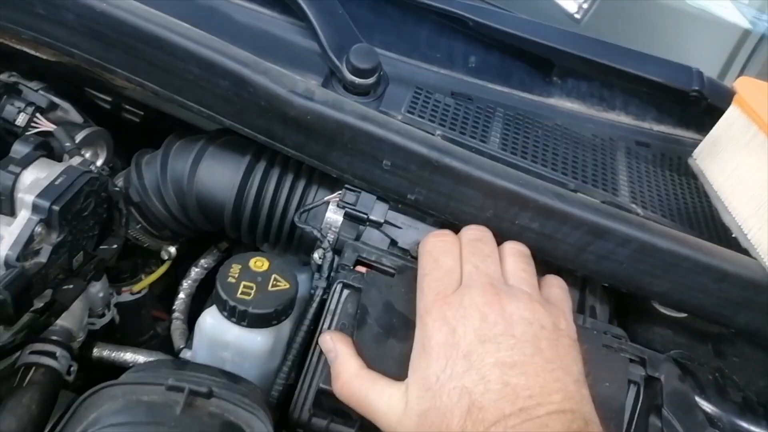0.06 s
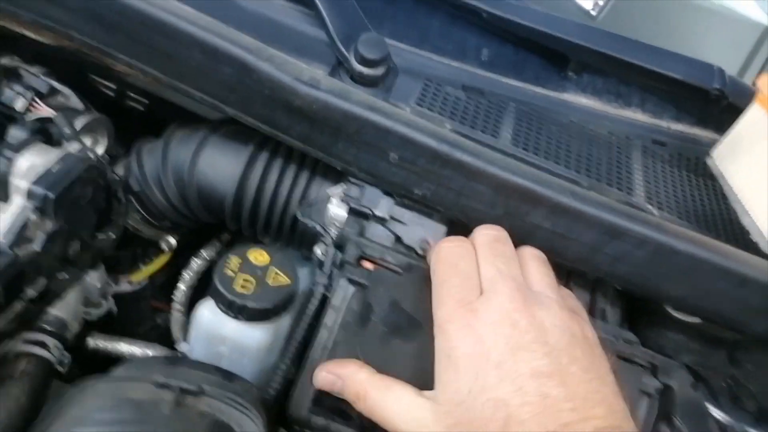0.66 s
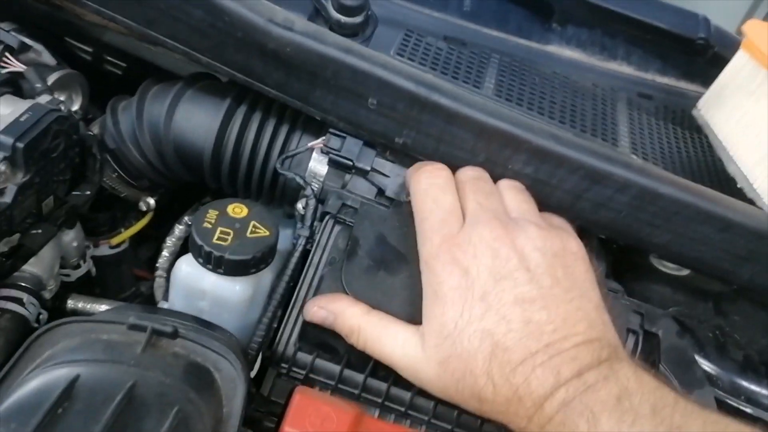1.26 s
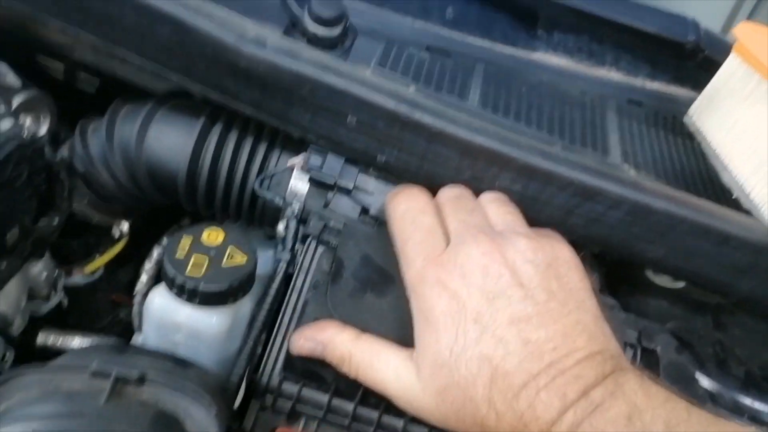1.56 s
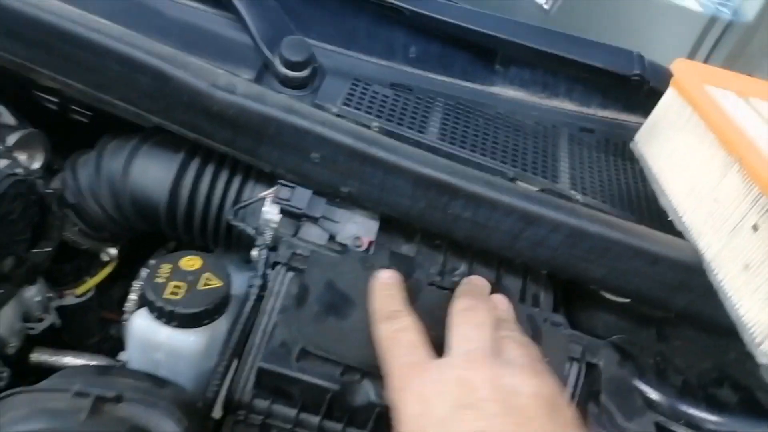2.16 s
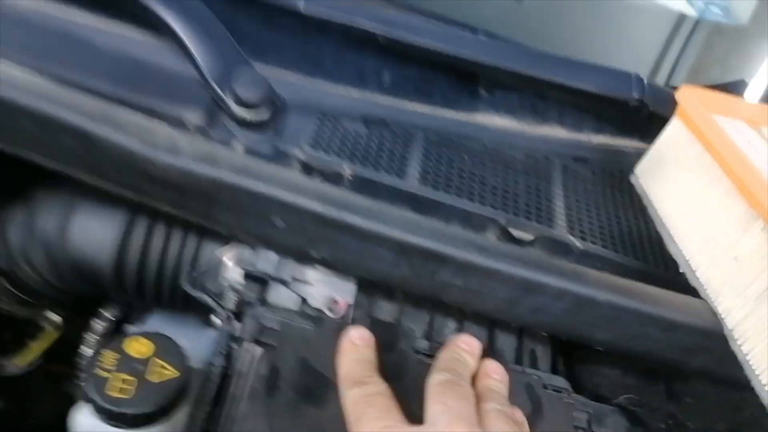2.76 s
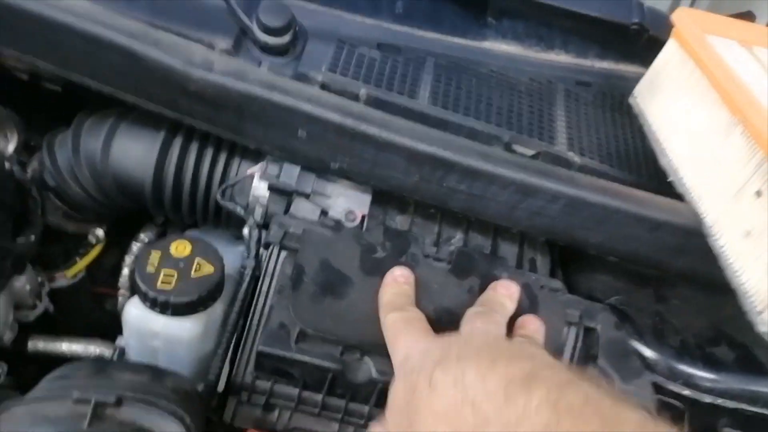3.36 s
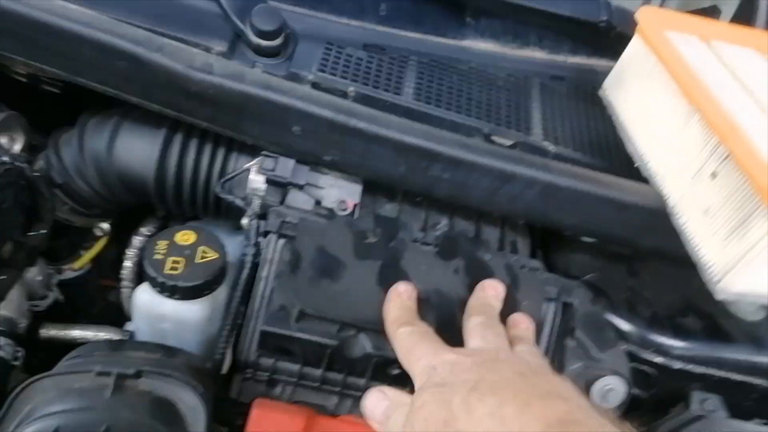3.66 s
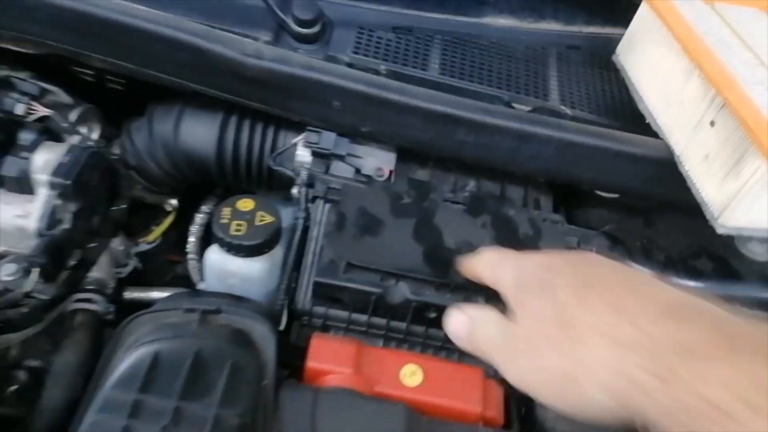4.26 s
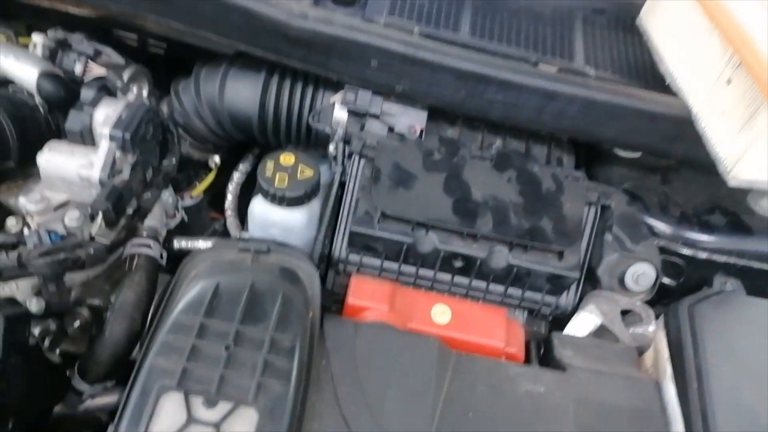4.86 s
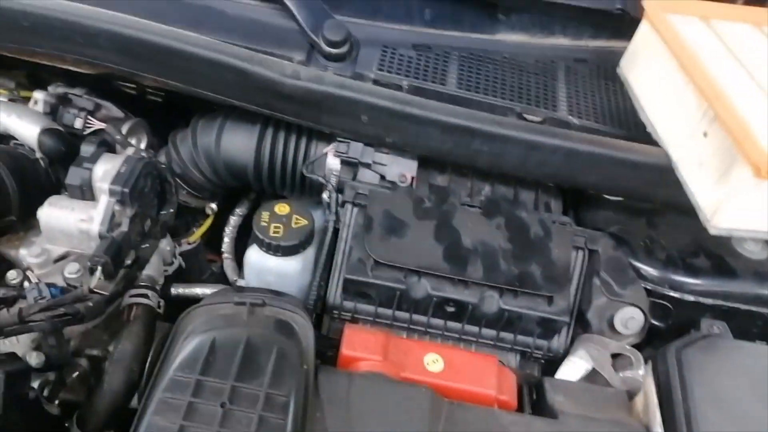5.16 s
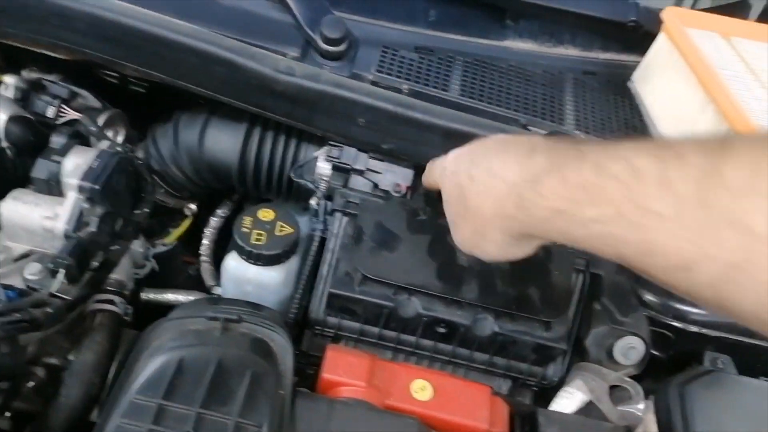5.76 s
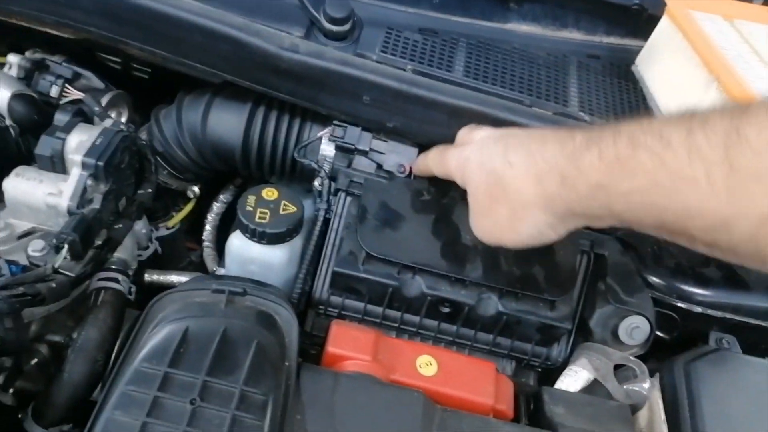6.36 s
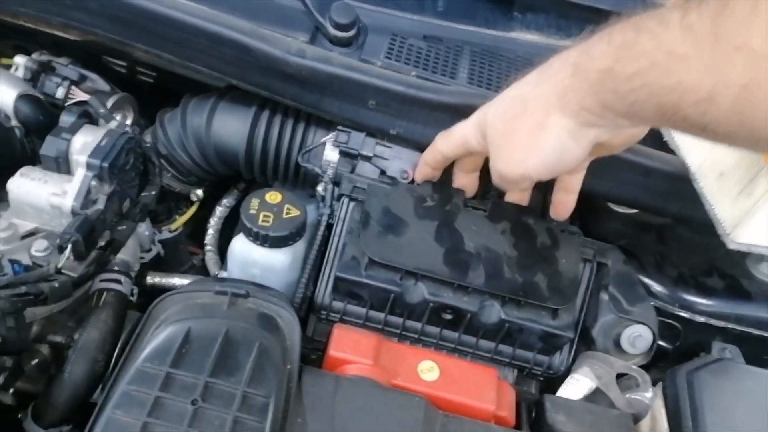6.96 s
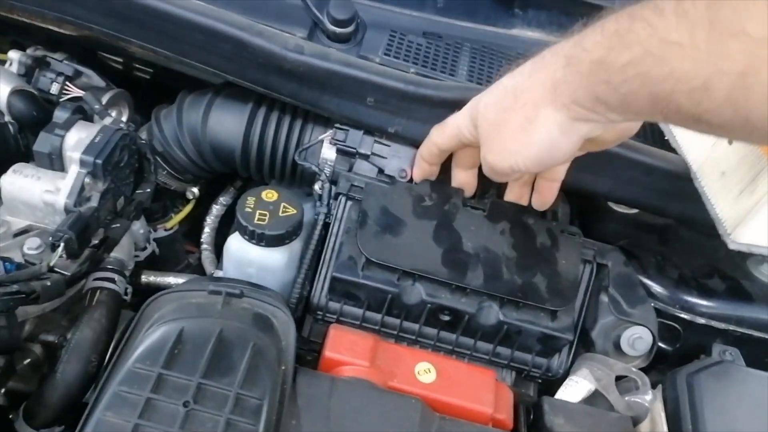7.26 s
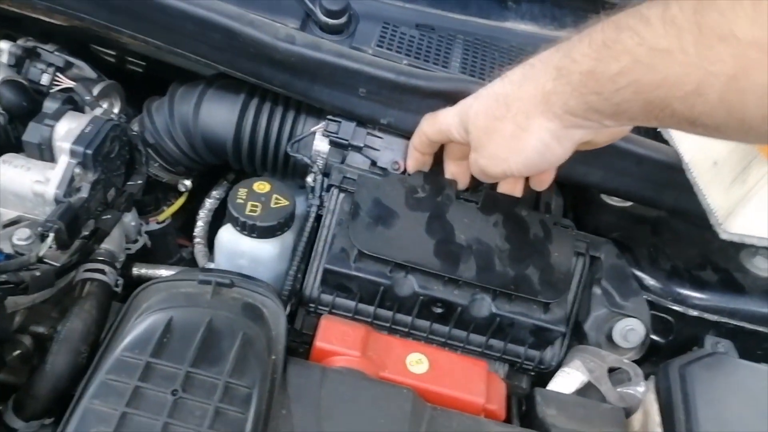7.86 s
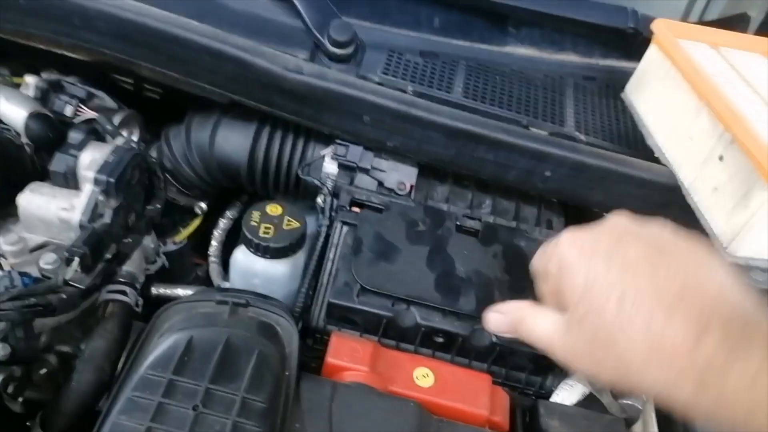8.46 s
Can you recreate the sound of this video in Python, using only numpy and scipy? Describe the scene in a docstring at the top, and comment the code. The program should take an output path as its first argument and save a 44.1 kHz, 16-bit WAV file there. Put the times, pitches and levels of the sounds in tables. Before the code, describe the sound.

Close to the microphone in a quiet workshop, a plastic lid clicks and knocks irregularly against a hollow filter box. Fingers then slide and tap softly on it, and the box rumbles faintly under the palm. The lid knocks twice with a short creak and, after more light handling, gives a sharp final clack. The harder hits leave a faint thin ring in the engine bay and a little room echo.

```python
"""A quiet workshop, under a car's open bonnet, the stereo microphone close to the air filter housing.
A hand rocks and presses the plastic lid into its seat. Each contact cracks at the rim, clacks in a
panel and thuds in the hollow box; in between, fingers and rim scrape, the plastic creaks and the box
hums or rumbles. Hard blows set a thin ring going in the engine bay, and the room answers."""
import sys
import numpy as np
from scipy import signal
from scipy.fft import rfft, irfft, next_fast_len
from scipy.io import wavfile
from scipy.ndimage import uniform_filter1d, map_coordinates

SR = 44100
rng = np.random.default_rng(int(sys.argv[2]) if len(sys.argv) > 2 else 0)


def inscribe(sig):
    """Save sig as 16-bit PCM at rate SR to the path in sys.argv[1].

    A 1-D sig is mono; a 2-D sig holds one channel per row.
    Samples are clipped to [-1, 1] before scaling.
    """
    pcm = np.round(np.clip(np.atleast_2d(sig).T, -1, 1) * 32767)
    wavfile.write(sys.argv[1], SR, pcm.astype(np.int16))


N = 374841
LEAD_S = .01  # time allowed for the scuff before a contact


# The lid on its seat, close up:
# (time [s], clack [dB], panel pitch [Hz], box thud before trim [dB], rim crack before trim [dB], length [s])
LID_KNOCKS = [(0.174, -45.5, 625, -39, -55, .009), (0.553, -30, 1100, -25.5, -45.5, 0.011),
              (1.009, -35.5, 1220, -36.5, -56.5, .005), (1.015, -40, 1170, -35, -66, 0.0037),
              (1.103, -21.5, 1220, -28, -35, .005), (1.112, -29, 425, -28, -47, 0.0089),
              (1.453, -26.5, 1050, -34.5, -53.5, 0.0019), (1.551, -42.5, 456, -46.5, -55.5, .006),
              (1.819, -38.5, 1325, -52, -49.5, .002), (1.865, -36, 680, -33.5, -50, 0.0056),
              (1.892, -38.5, 780, -39, -46, .004), (2.516, -21.5, 1336, -28, -39, .003),
              (2.813, -38, 900, -66, -54, 0.00088), (5.636, -27, 682, -30.5, -46.5, 0.011),
              (5.713, -32, 620, -35.5, -51.5, 0.0039), (7.9018, -19, 1210, -25.5, -34, 0.0034),
              (7.905, -21, 1540, -31.5, -38, 0.0049), (7.918, -25, 2200, -31.5, -35.5, .0045),
              (7.921, -21.5, 600, -30, -43, 0.0047), (8.091, -44.5, 509, -45.5, -60, 0.028)]

def knocks(hard_db=-33, touch_s=.0035, touch_db=-15.5, heavy_db=-28, rebound_s=.023, rebound_hz=449):
    """The lid strikes its seat; a hard blow lands edge first, and a heavy one drops back once, softly."""
    blows = list(LID_KNOCKS)
    for s, clack_db, hz, thud_db, crack_db, length in LID_KNOCKS:
        if clack_db > hard_db:
            blows.append((s - touch_s, clack_db + touch_db, hz,
                          thud_db + touch_db, crack_db + touch_db, length / 2))
        if thud_db > heavy_db:
            rebound_db = thud_db - 7.5
            blows.append((s + rebound_s, rebound_db - 17.5, rebound_hz, rebound_db, rebound_db - 31, .0036))
    return play_contacts(blows)


# Fingertips on the lid: (time [s], clack [dB], panel pitch [Hz])
FINGER_TAPS = [(0.773, -54.5, 796), (1.284, -49, 1050), (3.448, -60.5, 800), (3.746, -58.5, 880),
               (3.796, -49.5, 675), (4.07, -48, 1065), (4.203, -48, 984), (6.241, -62, 836),
               (6.473, -57, 820), (6.723, -49, 1730), (6.993, -56, 970)]

def taps(length=.0098):
    """Flesh makes a long, soft contact with little crack; a stiffer, higher spot moves the box less."""
    return play_contacts([(s, db, hz, db + 2.5 - 12 * np.log2(hz / 960), db - 9.5, length)
                          for s, db, hz in FINGER_TAPS])


# The rim catching: (time [s], crack before trim [dB])
RIM_TICKS = [(1.606, -51), (1.75, -61.5), (1.782, -57.5), (1.814, -50.5), (1.861, -36), (2.585, -56),
             (3.727, -62), (3.906, -54), (3.932, -59), (4.096, -67), (5.614, -50), (5.733, -41)]

def ticks(panel_hz=1250, length=.0022):
    """The rim slips past an edge with a short, bright contact."""
    return play_contacts([(s, db - 3, panel_hz, db - 1, db, length) for s, db in RIM_TICKS])


def play_contacts(blows, ring_above_db=-34.5):
    """Contacts, laid out as in LID_KNOCKS, sound in the room; only hard ones shake the parts nearby."""
    direct, radiated = np.zeros((2, 2, N))
    for s, clack_db, hz, thud_db, crack_db, length in blows:
        at_microphone, to_room = contact(s, clack_db, hz, thud_db, crack_db, length)
        add(direct, s - LEAD_S, at_microphone)
        add(radiated, s - LEAD_S, to_room)
        if clack_db > ring_above_db:
            add(direct, s, thin_ring(hz, clack_db - 17.5))
    return workshop(radiated, level_db=-11.5, direct=direct)[:, :N]


# Modes of the hollow box and of the lid's ribs and walls: (frequency [Hz], width [Hz], level [dB])
BOX_MODES = [(108, 120, -4.5), (150, 30, -1), (210, 81, -5.5), (322, 180, -6), (385, 44, -2.5),
             (458, 56, -13.5)]
LID_MODES = [(590, 270, 7.5), (667, 90, -4.5), (800, 90, 1), (1100, 60, -8), (1340, 230, -5.5),
             (1710, 80, -8.5), (2206, 270, -1.5)]
# Colour of the panel's clack and of the rim's crack: (frequency [Hz], level [dB])
PANEL_SPECTRUM = [(60, -8.5), (250, -12), (600, 2.5), (2000, 2.5), (2700, 3), (3400, -11.5), (7000, -16.5),
                  (12000, -30.5)]
CRACK_SPECTRUM = [(800, -28.5), (2500, 5.5), (4000, 2), (6300, 0), (7900, -8), (9500, -21.5),
                  (15000, -35.5)]
# Harder blows ring more clearly: (clack [dB], width over pitch [ratio])
PANEL_WIDTH = [(-52, 1.1), (-37, 0.79), (-23, 0.7)]
# The contacts drift between left and right as time goes on: (time [s], left minus right [dB])
LEFT_RIGHT_DRIFT = [(.55, 2), (1.1, -1), (1.45, 0.5), (1.85, -2), (2.5, -0.5), (4.2, -1), (7.9, -0.5)]

def contact(s, clack_db, hz, thud_db, crack_db, length, thud_trim_db=-.5, crack_trim_db=-1):
    """One contact drives panel, ribs, box and rim; returns the close sound and what the room receives."""
    t = np.arange(-round(LEAD_S * SR), SR // 6) / SR
    force = contact_force(t, length * .65, chatter_db=-3.5)
    width = hz * np.interp(clack_db, *np.transpose(PANEL_WIDTH))
    touched = lambda f: resonances([(hz, width, 0)], f) ** 2 * bending(f)
    panel = filtered(force, lambda f: touched(f) * causal(PANEL_SPECTRUM, f))
    ribs = filtered(force, lambda f: touched(f) * resonances(LID_MODES, f))
    clack = burst(burst(panel, 0) + burst(ribs, -7), clack_db)
    # a long, soft contact reaches only the box's deepest modes
    box = filtered(force, lambda f: resonances(BOX_MODES, f, polarity=1) / (1 + 1j * f * length / 3) ** 2)
    thud = burst(box, thud_db + thud_trim_db)
    snap = contact_force(t, length * .55, chatter_db=17)
    crack = burst(filtered(snap, lambda f: causal(CRACK_SPECTRUM, f)), crack_db + crack_trim_db)
    bright = engine_bay(clack + crack, level_db=-6, t60=.057)
    deep = engine_bay(thud, level_db=-2, t60=.12)
    pan = amp(np.interp(s, *np.transpose(LEFT_RIGHT_DRIFT)) * np.array([[.5], [-.5]]))
    return pan * (bright + deep), all_round(bright) + amp(-1) * deep


def contact_force(t, decay_s, chatter_db, scuff_share=.22):
    """The faces scuff as they meet, push once at t = 0, then chatter; longer contacts chatter more."""
    close_likeness = [(300, .95), (1200, .92), (2200, .41), (5000, -.18)]  # (frequency [Hz], correlation)
    push = np.zeros((2, len(t)))
    push[:, np.argmin(abs(t))] = 1
    envelope = np.exp(-abs(t) / np.where(t < 0, scuff_share * decay_s, decay_s))
    chatter = noise(len(t), close_likeness) * envelope
    return burst(push, 0) + burst(chatter, chatter_db) * np.sqrt(decay_s / .001)


def bending(f, delay_at_1khz_s=.0006):
    """Bending waves cross the lid faster at high pitch."""
    return np.exp(-4j * np.pi * delay_at_1khz_s * np.sqrt(1000 * f))


# Parts around the housing: (frequency [Hz], relative level [dB], t60 [s])
RING_MODES = [(1346, -1.5, 0.72), (1701, -6.5, 1), (2150, -8, 0.82), (2275, -3, 0.34), (2410, -3, .6),
              (2380, -23.5, .65), (2580, -5.5, .9), (2400, -8.5, 0.72), (2767, -9.5, 0.93),
              (3900, -17.5, 0.75)]

def thin_ring(pitch_hz, level_db, rise_s=.0022):
    """Lightly damped parts ring on, most after high-pitched contacts."""
    t = np.arange(SR * 3 // 4) / SR
    ring = np.zeros((2, len(t)))
    for hz, db, t60 in RING_MODES:
        decay = amp(db + rng.normal(0, 2) - 60 * t / t60)
        ring += decay * np.sin(2 * np.pi * hz * t + rng.uniform(0, 2 * np.pi, (2, 1)))
    coupling = min(pitch_hz / 1700, 1) ** 2.5
    return burst(ring * (1 - np.exp(-t / rise_s)), level_db) * coupling


# Sliding near the microphone: (start [s], length [s], scrape [dB], hiss [dB])
SLIDING_STROKES = [(.49, 0.5, -64.5, -72), (1.765, 0.044, -50.5, -63.5), (1.806, .065, -41.5, -56),
                   (1.92, .11, -57, -59), (2.13, .13, -72, -63), (2.812, .055, -52.5, -62.5),
                   (2.89, .11, -57.5, -54.5), (3.22, .13, -66, -71), (3.351, .043, -57.5, -69),
                   (3.41, .12, -65, -70), (3.5, .1, -65, -63), (3.66, 0.68, -75, -80),
                   (4.4, .65, -79, -90.5), (5.586, .05, -45.5, -69.5), (5.97, .32, -71, -77.5),
                   (6.49, 0.055, -65.5, -71.5), (6.64, 0.45, -74, -89.5)]
# Colour of the scrape and of the hiss above it: (frequency [Hz], level [dB])
SCRAPE_SPECTRUM = [(100, -8.5), (400, 0.5), (800, -1), (1600, 1.5), (2600, -8.5), (4000, -14), (12000, -52)]
HISS_SPECTRUM = [(700, -25), (2300, 1), (3500, -2.5), (4800, -5.5), (6600, 0.5), (8300, -9.5),
                 (10000, -22.5), (15000, -30)]

def strokes(grain_db=3.5, grain_rate=600):
    """Skin and rim slide over grained plastic, sticking and slipping."""
    out = np.zeros((2, N))
    for s, length, scrape_db, hiss_db in SLIDING_STROKES:
        size = int(length * SR)
        slips_db = grain_db * wobble(size, grain_rate)
        scrape = amp(scrape_db) * unit(noise(size, MIC_LIKENESS, SCRAPE_SPECTRUM) * amp(slips_db))
        hiss = amp(hiss_db) * unit(noise(size, MIC_LIKENESS, HISS_SPECTRUM) * amp(slips_db / 2))
        pressure = unit(np.sin(np.linspace(0, np.pi, size)))
        add(out, s, workshop((scrape + hiss) * pressure, level_db=-11))
    return out


# Plastic creaks and scuffs, and the hollow box's low hum lingering after a knock:
# (start [s], length [s], pitch [Hz], level [dB])
CREAKS_AND_HUMS = [(0, 0.27, 128, -54), (0.436, 0.06, 1410, -51), (2.915, 0.035, 6800, -58.5),
                   (3.356, .036, 720, -60.5), (3.36, .024, 3240, -61.5), (4.06, 0.032, 1100, -48),
                   (4.115, 0.027, 3600, -59.5), (5.585, .11, 624, -45), (6.5, .016, 3530, -62.5),
                   (6.64, 0.53, 2430, -75), (6.723, .013, 1450, -48), (7.92, 0.17, 143, -44)]
# The shortest ping, scuffs are rough, long ones settle on a note: (length [s], width over pitch [ratio])
RESONANCE_WIDTH = [(.01, .17), (.04, .42), (.2, .24), (.5, .12)]

def creaks_and_hums(roughness_db=2.5, roughness_rate=700):
    """One resonance sounds unevenly: the plastic creaks or scuffs, or the hollow box hums low."""
    out = np.zeros((2, N))
    for s, length, hz, db in CREAKS_AND_HUMS:
        size = int(length * SR)
        drive = noise(size, MIC_LIKENESS) * amp(roughness_db * wobble(size, roughness_rate))
        swell = unit(np.sqrt(abs(np.sin(np.linspace(0, np.pi, size)))))
        width = hz * np.interp(length, *np.transpose(RESONANCE_WIDTH))
        tone = unit(filtered(drive, lambda f: resonances([(hz, width, 0)], f) ** 2))
        add(out, s, workshop(amp(db) * tone * swell, level_db=-14))
    return out


# The palm on the lid: (start [s], length [s], level [dB])
PALM_PRESSES = [(0.456, 0.52, -58.5), (2.84, 0.093, -59), (3.274, 0.17, -57), (3.672, 0.43, -53.5),
                (6.677, 0.34, -65)]
# Colour of the box's rumble: (frequency [Hz], level [dB])
RUMBLE_SPECTRUM = [(25, -17), (70, 4.5), (135, -1.5), (220, -15), (420, -8.5), (800, -18.5), (2000, -28.5),
                   (8000, -63)]

def presses(attack_s=.013, release_s=.15, waver_db=3, waver_rate=30):
    """The box rumbles softly while the hand leans on it: the weight builds, wavers and lets go."""
    t = np.arange(N) / SR
    weight = np.zeros(N)
    for s, length, db in PALM_PRESSES:
        build = np.clip((t - s) / attack_s, 0, 1)
        release = np.exp(-np.maximum(t - s - length, 0) / release_s)
        weight += amp(db) * build * release
    rumble = noise(N, MIC_LIKENESS, RUMBLE_SPECTRUM)
    return weight * unit(rumble * amp(waver_db * wobble(N, waver_rate)))


# Likeness of left and right for echoes and rubbing: (frequency [Hz], correlation [-1 to 1])
MIC_LIKENESS = [(100, 0.91), (300, 0.92), (520, 0.43), (900, .15), (1500, -0.29), (2600, .05), (8000, 0.54)]

def engine_bay(x, level_db, t60):
    """Adds dense early echoes off the engine and the open bonnet."""
    t = np.arange(SR // 10) / SR
    echoes = noise(len(t), MIC_LIKENESS) * amp(-60 * t / t60) * (1 - np.exp(-t / .001))
    echoes *= amp(level_db) / np.linalg.norm(echoes[0])
    return x + signal.fftconvolve(x, echoes, axes=1)[:, :x.shape[1]]


def all_round(x, smooth_hz=450):
    """The lid radiates differently to each side, so the room gets a click with x's smoothed spectrum."""
    hz = np.fft.rfftfreq(x.shape[1], 1 / SR)
    power = np.mean(abs(rfft(x)) ** 2, axis=0)
    smoothed = abs(uniform_filter1d(power, int(smooth_hz / hz[1]) + 1))
    spectrum = np.column_stack([hz, 10 * np.log10(smoothed + 1e-14)])
    click = np.zeros_like(x)
    click[:, round(LEAD_S * SR)] = 1
    return filtered(click, lambda f: causal(spectrum, f))


# Colour of the room beyond the car: (frequency [Hz], gain [dB])
ROOM_COLOUR = [(40, 10), (130, 4.5), (400, 5.5), (800, -3.5), (1500, -6), (2500, 0), (4000, -1), (7000, -2),
               (12000, 0.5)]
# Its reverberation: (frequency [Hz], t60 [s])
ROOM_DECAY = [(100, .9), (400, 0.59), (1200, 0.84), (2500, 0.82), (6000, 0.94), (12000, 0.64)]

def workshop(x, level_db, direct=None, build_up_s=.017):
    """The direct sound (x unless given) plus the room's answer, each band dying at its own speed."""
    hz, t, bands = signal.stft(noise(SR, MIC_LIKENESS), SR, nperseg=256)
    decay = amp(-60 * t / along(ROOM_DECAY, hz)[:, None])
    _, tail = signal.istft(bands * decay * (1 - np.exp(-t / build_up_s)), SR, nperseg=256)
    tail = filtered(tail / np.linalg.norm(tail[0]), lambda f: amp(along(ROOM_COLOUR, f)))
    out = amp(level_db) * signal.fftconvolve(x, tail, axes=1)
    out[:, :x.shape[1]] += x if direct is None else direct
    return out


# Room tone: (frequency [Hz], level [dB])
AIR_SPECTRUM = [(20, -5.5), (58, 2), (80, -9.5), (140, -8), (220, -13), (500, -16), (1000, -20.5),
                (2500, -25), (4500, -29), (6800, -31), (8000, -36.5), (9500, -42.5), (15000, -47)]
# Its left-right likeness at the microphone: (frequency [Hz], correlation [-1 to 1])
AIR_LIKENESS = [(40, 0.63), (100, 0.74), (500, 0.21), (2000, 0.043)]

def room_air(level_db=-67):
    """The steady hush of the workshop, far behind the hand."""
    return amp(level_db + .6 * wobble(N, 11)) * noise(N, AIR_LIKENESS, AIR_SPECTRUM)


def amp(db):
    """Decibels to gain."""
    return 10 ** (np.asarray(db) / 20)


def unit(x):
    """Scale to rms 1."""
    return x / np.sqrt(np.mean(x ** 2) + 1e-20)


def burst(x, db, window_s=.01):
    """Scale a stereo hit so that its energy, spread over the window, has this rms level."""
    return x * amp(db) * np.sqrt(window_s * SR / (np.sum(x ** 2) / 2 + 1e-20))


def along(points, hz):
    """Read (Hz, value) points on a log axis."""
    f, values = np.transpose(points)
    return np.interp(np.log(hz + 1), np.log(f + 1), values)


def add(track, s, x):
    """Mix x into the track at time s."""
    start = max(round(s * SR), 0)
    track[:, start:start + x.shape[1]] += x[:, :N - start]


def filtered(x, response):
    """Pass x through a complex response of frequency."""
    size = 2 * next_fast_len(x.shape[-1] // 2 + 2048)
    hz = np.fft.rfftfreq(size, 1 / SR)
    return irfft(rfft(x, size) * response(hz), size)[..., :x.shape[-1]]


def causal(points, hz):
    """Minimum-phase response with the given (Hz, dB) spectrum."""
    cepstrum = irfft(np.log(amp(along(points, hz))))
    cepstrum[1:len(hz) - 1] *= 2
    cepstrum[len(hz):] = 0
    return np.exp(rfft(cepstrum))


def resonances(modes, f, polarity=-1):
    """Response of (Hz, width, dB) modes; neighbours swing against (-1) or with (+1) each other."""
    return sum(polarity ** k * amp(db) * 1j * f * width / (hz * hz - f * f + 1j * f * width)
               for k, (hz, width, db) in enumerate(modes))


def noise(size, likeness, spectrum=None):
    """Stereo noise of rms 1 with a given likeness of the channels and an optional colour."""
    def response(hz):
        angle = np.arccos(np.clip(along(likeness, hz), -1, 1)) / 2
        colour = 1 if spectrum is None else amp(along(spectrum, hz))
        return np.array([np.cos(angle), np.sin(angle)]) * colour
    mid, side = filtered(rng.standard_normal((2, size)), response)
    return unit(np.array([mid + side, mid - side]))


def wobble(size, rate):
    """A smooth random curve, rate knots a second."""
    knots = rng.standard_normal(int(size * rate / SR) + 4)
    return map_coordinates(knots, [np.arange(size) * rate / SR])


def scene():
    """Lid and hand up close, the workshop behind."""
    return knocks() + taps() + ticks() + strokes() + creaks_and_hums() + presses() + room_air()


def record(dry, top_hz=15150):
    """The two microphone ports differ a little in colour; nothing is kept above the band limit."""
    # (frequency [Hz], left minus right [dB])
    balance = [(100, .5), (250, 1.5), (600, .5), (1100, .5), (2200, -.5), (4000, -1.5), (8000, 2)]
    return filtered(dry, lambda hz: amp(np.outer([.5, -.5], along(balance, hz))) * (hz < top_hz))


dry = scene()
out = record(dry)
inscribe(out)
```